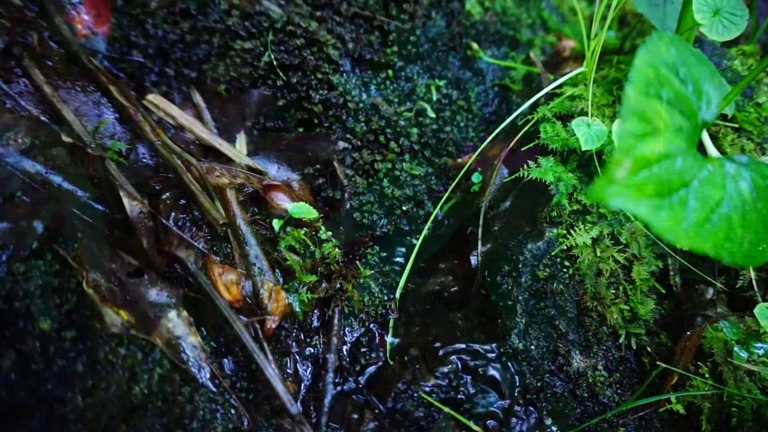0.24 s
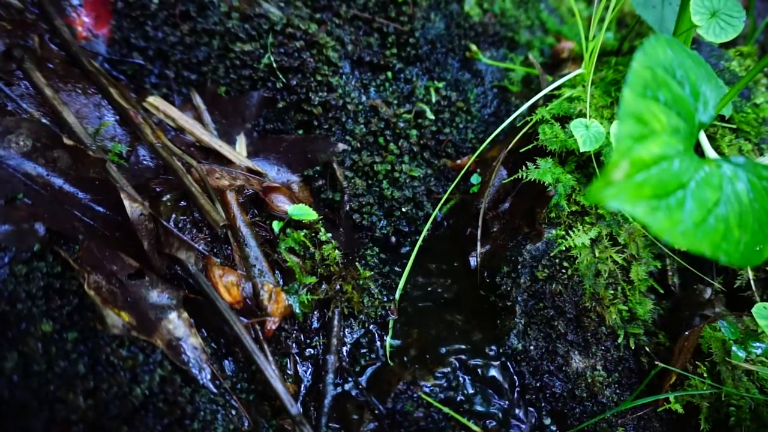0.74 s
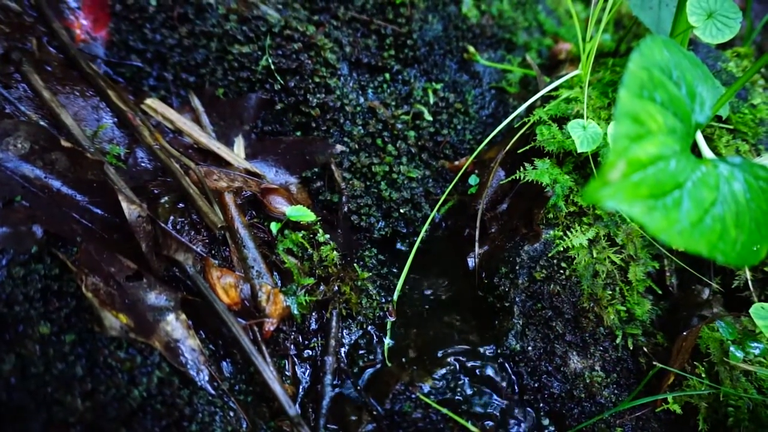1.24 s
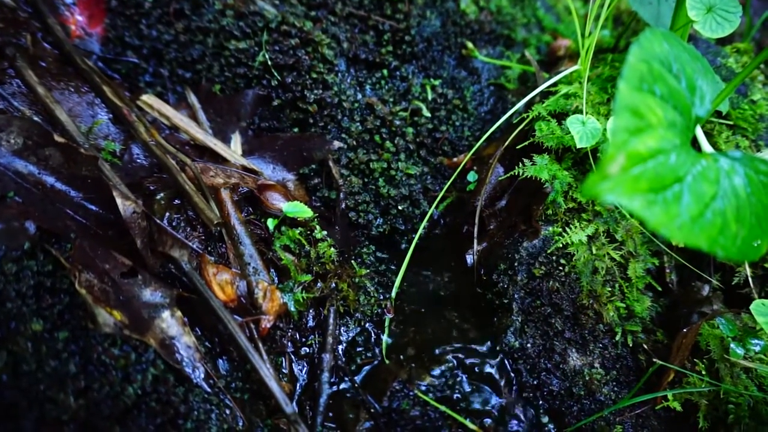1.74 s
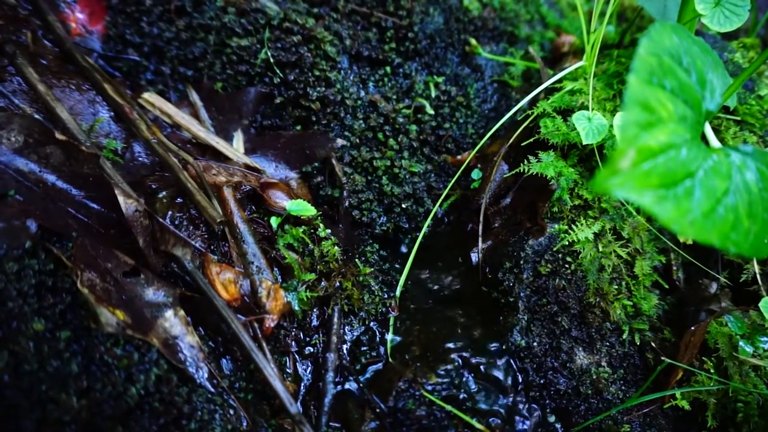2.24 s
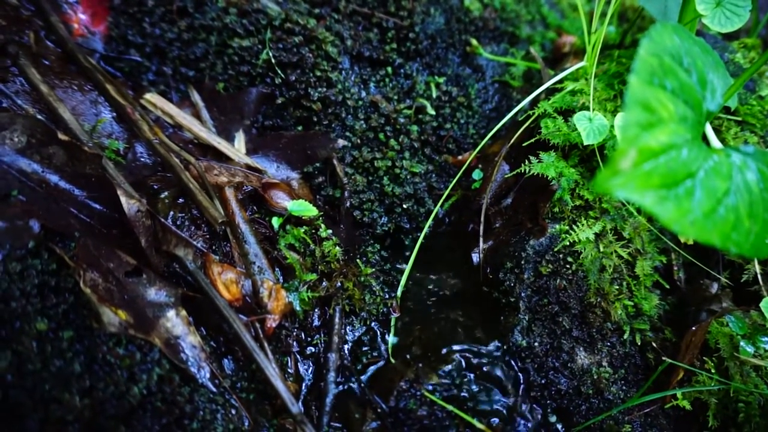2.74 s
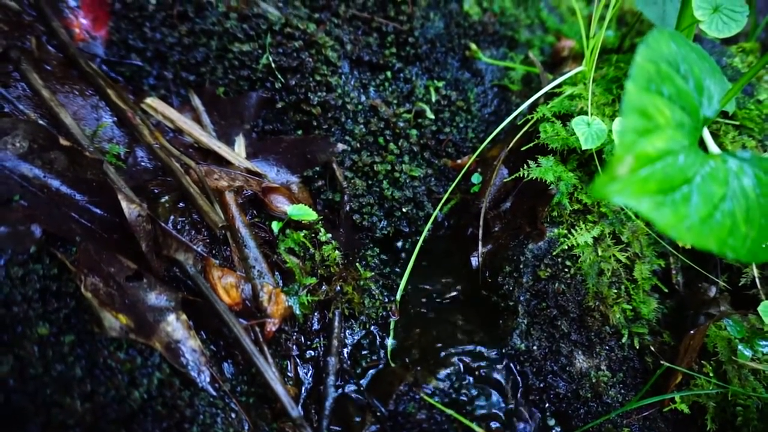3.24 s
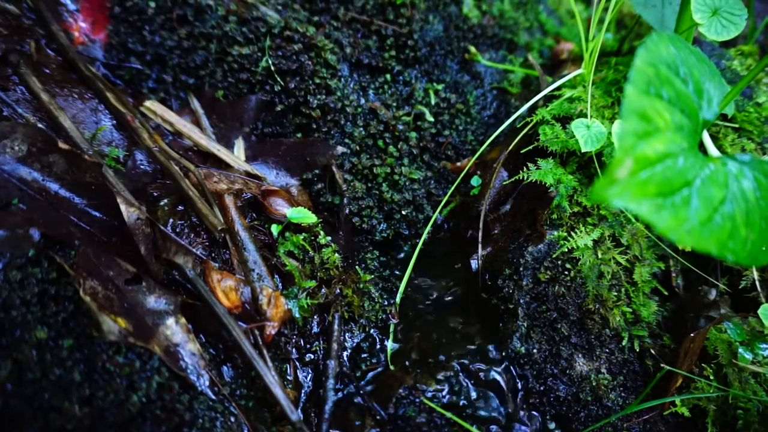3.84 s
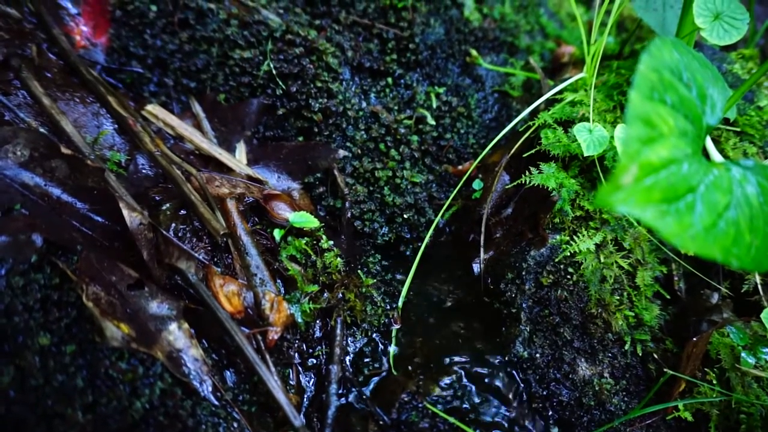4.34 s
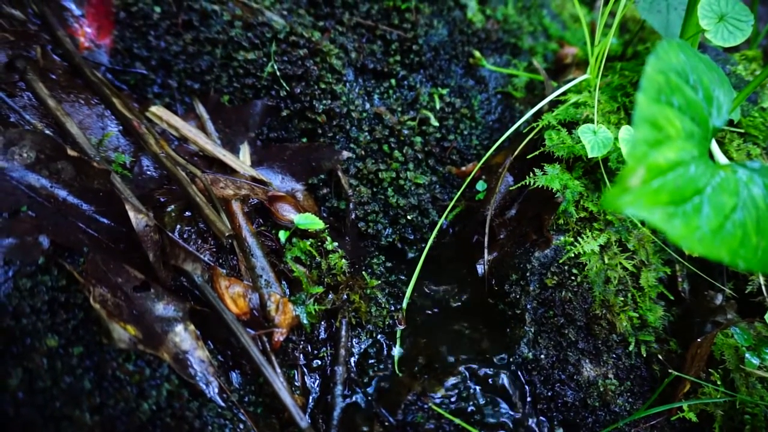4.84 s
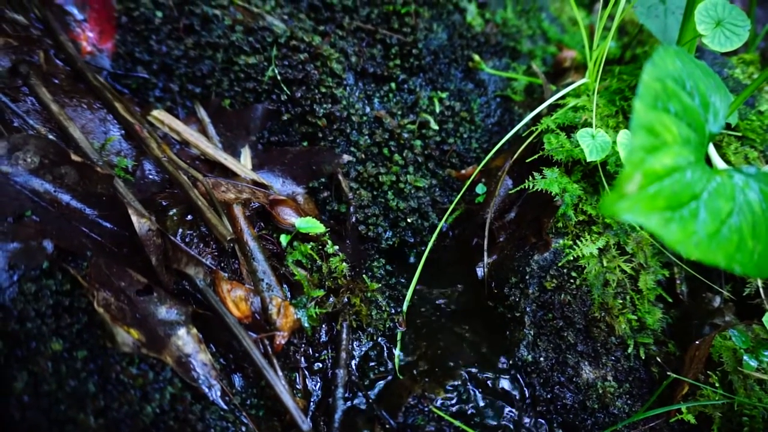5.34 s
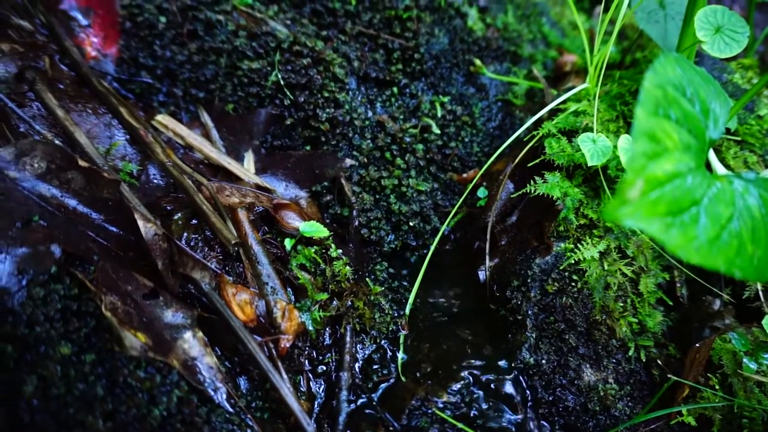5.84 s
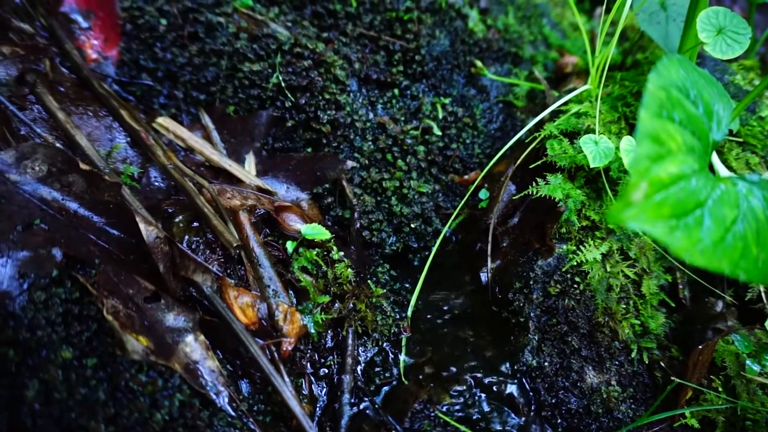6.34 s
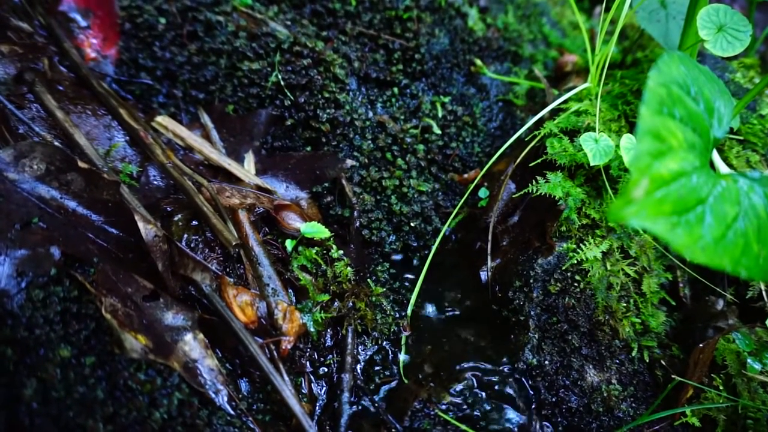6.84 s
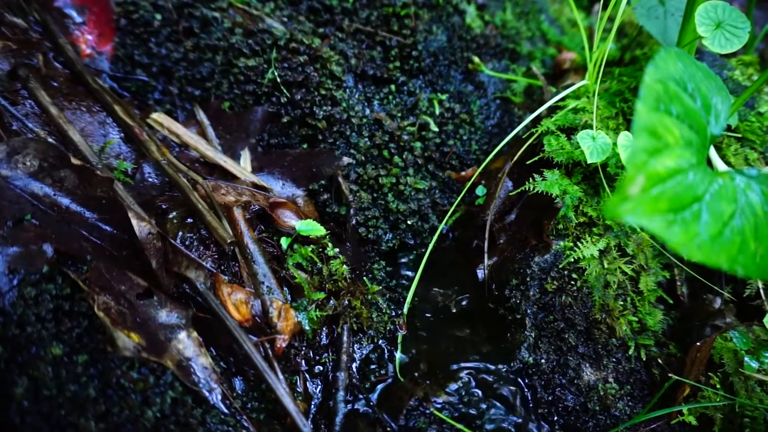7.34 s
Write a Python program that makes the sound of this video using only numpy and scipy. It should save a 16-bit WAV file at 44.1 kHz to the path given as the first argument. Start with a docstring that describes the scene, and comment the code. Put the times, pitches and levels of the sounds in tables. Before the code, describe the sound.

Steady close-up spring water in a small rock hollow. Drops slap the pool at random, each a very short, hollow mid-pitched plop with a tiny splash; clear bubbles blip upward and fainter low gurgles swell between them. Crisp high clicks of bursting films sparkle around. A soft babble and thin wash fill the gaps. Nearly dry, little bass, wide stereo with brighter plips toward the left.

```python
"""A small spring trickles over mossy rock into a shallow pool, close by and mostly a little to the left.
Drops slap the surface as paired short swings; bubbles are decaying sines that rise in pitch;
larger pockets are swelling upward sweeps; bursting films and spray are pings with a noise splat.
Beneath lie babble (many weak bubbles in the rock hollow), fizz (tiny rings) and a wash of filtered noise."""
import sys
import numpy as np
from scipy import signal
from scipy.fft import rfft, irfft, next_fast_len
from scipy.io import wavfile

SR = 44100
rng = np.random.default_rng(int(sys.argv[2]) if len(sys.argv) > 2 else 0)


def digitize_waveform(pressure):
    """Quantize a signal to 16-bit integers and store it at the path in sys.argv[1].

    Rows of a 2-D input are taken as channels; values are limited to [-1, 1].
    """
    field = np.atleast_2d(pressure).T
    bounded = np.clip(field, -1, 1)
    quanta = np.round(bounded * 32767).astype(np.int16)
    wavfile.write(sys.argv[1], SR, quanta)


N = 334719

# clear bubbles: t/s, peak level before BUBBLE_GAIN_DB/dB, start pitch f/Hz, decay time/ms
BUBBLES = [(0.0845, -31.5, 1305, 3.9), (0.5029, -21, 1780, 1.4), (0.597, -23.5, 1310, 3.3),
           (0.6491, -22.5, 1180, 9.6), (0.6622, -16.5, 1490, 0.61), (0.7188, -24, 1680, 1.3),
           (0.946, -20.5, 1180, 3.1), (0.954, -12.5, 1020, 3.5), (0.9579, -14, 1170, 1.9),
           (1.0507, -14.5, 822, 4.3), (1.2348, -23.5, 1390.0, 1.1), (1.2548, -28, 646, 2.9),
           (1.774, -30.5, 1310, 4.3), (1.794, -23.5, 1675, 3.4), (1.697, -30.5, 1290, 3),
           (2.732, -21, 1396, 1.8), (3.1717, -17, 1360, 2), (3.269, -10, 1470, 0.95),
           (3.192, -31, 930, 5.2), (3.4885, -32, 1500, 2.7), (3.5204, -25, 714, 2.5),
           (3.554, -30, 1330, 4.2), (3.6244, -27.5, 740, 1.6), (4.3294, -24.5, 1110.0, 1.8),
           (4.4326, -29.5, 1280, 6.3), (4.492, -31, 1284, 9.6), (4.5409, -22.5, 1680, 0.7),
           (4.5762, -23.5, 1260, 3.7), (4.728, -29.5, 818, 6), (4.9783, -22, 1214, 2.5),
           (5.183, -34.5, 580, 3), (5.324, -24.5, 1220, 4.2), (5.3405, -16.5, 1530, 1.8),
           (5.3834, -23, 1320, 3.8), (5.665, -22.5, 1540, 1.2), (5.801, -23, 907, 4.1),
           (5.8604, -19.5, 1240, 2.3), (5.902, -23.5, 1170, 1.2), (5.9704, -24, 1800, 2.5),
           (6.604, -30, 1775, 3), (6.008, -33, 600, 2.5), (6.2184, -28.5, 1243, 3.7),
           (6.7421, -25, 1404, 4.5), (6.9246, -19, 1420, 1.4), (7.2495, -26.5, 1066, 3),
           (7.266, -21.5, 1355, 2), (7.56, -22.5, 1600, 1.2)]
# air pockets that swell and surface: t/s, start pitch f/Hz, peak level/dB, length/ms
GULPS = [(0.046, 400, -39.5, 22), (0.193, 367, -42.5, 38), (0.275, 358, -39, 53), (0.474, 394, -34, 14.5),
         (0.682, 368, -46, 49), (0.832, 251, -47, 54), (0.959, 1560, -28, 8.5), (1.047, 482, -33, 43),
         (1.054, 848, -21, 18.2), (1.321, 427.5, -43, 44), (1.568, 284, -42, 21), (1.677, 360, -46, 40),
         (1.766, 320, -41.5, 37), (1.961, 376, -37.5, 40), (2.339, 327, -43.5, 32),
         (2.443, 335, -38.5, 28.5), (2.735, 410, -40, 27), (2.925, 454, -43, 30), (3.148, 368, -32, 27.5),
         (3.232, 304, -39.5, 31), (3.355, 389, -38.5, 24), (3.423, 372, -39, 41), (3.803, 370, -45, 24),
         (4.172, 754, -28.5, 16), (4.448, 810, -27, 21), (4.584, 403, -45, 64), (5.218, 347, -34, 39),
         (5.423, 460, -52, 36), (5.476, 457, -44, 29), (5.623, 423, -32.5, 33), (5.692, 460, -33.5, 29),
         (5.796, 733, -31.5, 45), (6.111, 365, -36, 25), (6.212, 397, -41, 32), (6.326, 396, -39, 33),
         (6.518, 408, -31.5, 27), (6.738, 600, -30, 23), (6.839, 456, -34.5, 16), (6.938, 460, -28, 17.6),
         (7.052, 477, -37, 9.8), (7.265, 451, -32, 28.4)]
# drops that slap the pool without a clear ring: t/s, peak level/dB, centre f/Hz
DROPS = [(0.053, -26, 1300), (.171, -30.5, 1100), (.379, -20, 1080), (0.427, -26.5, 830),
         (0.795, -34, 1250), (1.1995, -24, 1530), (1.219, -32, 1380), (1.48, -28, 1340),
         (1.546, -29.5, 860), (1.589, -27, 1160), (1.683, -23.5, 880), (1.745, -27.5, 770),
         (1.881, -30, 607), (1.928, -31.5, 1290), (1.953, -26, 1300), (2.0195, -27, 1140),
         (2.151, -34, 1310), (2.32, -32.5, 1400), (2.495, -30.5, 1040), (2.542, -28.5, 1280),
         (2.589, -27.5, 1440), (2.645, -33.5, 1050), (2.671, -27.5, 900), (2.984, -27.5, 1130),
         (3.1125, -19.5, 1220), (3.376, -25.5, 1260), (3.4706, -22, 890), (3.535, -27, 1080),
         (3.593, -25.5, 1220), (3.82, -29.5, 1175), (3.883, -24, 1210), (3.922, -31, 1040),
         (4.004, -25.5, 1100), (4.053, -27, 1020), (4.133, -30, 1100), (4.1708, -26.5, 1010),
         (4.527, -30, 1710), (4.627, -30, 1140), (4.715, -30.5, 860), (4.751, -23.5, 1060),
         (5.062, -30.5, 1220), (5.417, -30.5, 1440), (5.545, -29, 1420), (5.6094, -21, 1280),
         (5.716, -31, 1360), (5.878, -24.5, 2000), (5.991, -25, 1910), (6.048, -28, 1270),
         (6.1198, -20, 1610), (6.301, -30, 1210), (6.396, -24.5, 1050), (6.436, -32.5, 1550),
         (6.5273, -21, 1040), (6.5361, -22.5, 1290), (6.643, -27, 890), (7.011, -22.5, 1710),
         (7.071, -27.5, 1440), (7.1407, -25.5, 1090), (7.176, -30, 1450), (7.283, -33, 920),
         (7.4376, -18.5, 1550), (7.474, -25, 1500), (7.509, -28.5, 1130), (7.551, -24, 1400)]
# sharpest spray ticks: t/s, level before TICK_GAIN_DB/dB, centre f/Hz
TICKS = [(0.129, -23, 9940), (0.3417, -29.5, 4080), (0.6994, -25, 6230), (.724, -25, 7750),
         (1.306, -23, 13000), (1.3324, -28, 5960), (1.459, -27, 14900), (1.757, -24.5, 14600),
         (1.951, -27, 3160), (2.436, -25.5, 12200), (2.6268, -25, 11800), (2.9147, -24.5, 10400),
         (2.998, -26, 11900), (3.13, -25, 3270), (3.139, -29, 11700), (3.174, -20.5, 11700),
         (3.701, -19, 4880), (3.7615, -25, 13600), (3.9572, -28, 14500), (4.6552, -25.5, 12900),
         (5.0775, -23.5, 3430), (5.1176, -23, 11940), (5.379, -28, 12500), (5.769, -27, 7300),
         (6.0205, -27, 8840), (6.1432, -28, 11100), (6.2983, -29, 10400), (6.3664, -27.5, 5970),
         (6.452, -29, 14100), (6.63, -27, 13200), (6.877, -27.5, 13150), (7.1616, -26.5, 9600),
         (7.2623, -33, 14300), (7.4, -25, 8660), (7.576, -23, 7750)]
# resonances of the rock hollow: f/Hz, decay time/ms, relative level/dB
HOLLOW_MODES = [(480, 2.2, -8), (890, 2.4, -2), (1260, 2.4, 0), (1720, 2.0, -4), (2400, 1.2, -16)]
# where the pool lies: f/Hz, left minus right/dB
POOL_PAN = [(350, -9.5), (700, 2), (1300, 5), (2200, 14)]
# colour of the babble leaving the hollow: f/Hz, gain/dB
BABBLE_COLOUR = [(150, -3), (330, 11), (520, 11.5), (740, 1.5), (930, 13), (1100, -3.5), (1280, 14),
                 (1720, 10.5), (3200, 19)]
# spectrum of the running water's murmur: f/Hz, relative density/(dB per Hz)
MURMUR_SPECTRUM = [(25, -28), (84, -20.5), (200, -14.5), (450, -5), (1500, -3), (5000, -16)]

BUBBLE_GAIN_DB, TICK_GAIN_DB = 3.0, -5.5
# pitch rise, in start pitches per s, at a table level of RISE_FROM_DB; each RISE_DOUBLING_DB more doubles it
RISE_PER_S, RISE_FROM_DB, RISE_DOUBLING_DB = 11, -18, 3
KNOCK_DB = -15
HOLLOW_SPREAD = 0.047  # standard deviation of the resonances' shift from spot to spot, as a share
DROP_DECAY_MS, DROP_KNOCK_DB, DROP_RISE_PER_S = 1, -6, 60
CRATER_LAG_MS, CRATER_DB = 2.547, -4.5  # closing swing after the slap; lag is scaled at random
# faint gulp with each drop: level re drop peak; start pitch and length before random scaling
WAKE_DB, WAKE_HZ, WAKE_MS = -19, 400, 34
OCTAVE_SWEEP_MS, SWEEP_BEND = 15.47, 1.693  # a gulp this long climbs one octave, ever faster
GULP_SKEW = 0.73  # under 1: swells quickly, fades slowly
# splash: level re table level, capped at the limit; pitch before random scaling
SPLASH_DB, SPLASH_LIMIT_DB, SPLASH_HZ = -23, -12, 2980
TOP_HZ = 16000


def pool():
    """Plips, slaps and gulps where the trickle lands; bubbles nearer the surface are louder and rise faster."""
    out = np.zeros((2, N))
    for s, db, hz, decay_ms in BUBBLES:
        rise_per_s = RISE_PER_S * 2 ** ((db - RISE_FROM_DB) / RISE_DOUBLING_DB)
        add(out, s, undb(db + BUBBLE_GAIN_DB) * bubble(hz, decay_ms, rise_per_s))
    for s, db, hz in DROPS:
        add(out, s, undb(db) * drop(hz))
        pitch_scale, length_scale = 2 ** rng.uniform(-0.478, 0.42, size=2)
        wake = gulp(WAKE_HZ * pitch_scale, WAKE_MS * length_scale)
        add(out, s, undb(db + WAKE_DB) * wake)
    for s, hz, db, length_ms in GULPS:
        add(out, s, undb(db) * gulp(hz, length_ms))
    return out


def bubble(hz, decay_ms, rise_per_s, knock_db=KNOCK_DB, onset_cycles=0.9):
    """Air pinches off with a knock that rings the hollow, then rings down, sharpening as it nears the surface."""
    ms = np.arange(int((6 * decay_ms + 6) * SR / 1000)) * 1000 / SR
    t = np.arange(len(ms)) / SR
    onset = 1 - np.exp(-(t * hz / onset_cycles) ** 2)
    swing = np.exp(-ms / decay_ms) * onset
    tone = swing / swing.max() * np.sin(2 * np.pi * hz * (t + rise_per_s * t ** 2 / 2))
    # each spot meets the resonances in its own way
    spot = rng.standard_normal((len(HOLLOW_MODES), 2))
    knock = np.zeros(len(ms))
    for (mode_hz, ring_ms, db), (weight, shift) in zip(HOLLOW_MODES, spot):
        # resonances within half an octave merge with the bubble
        apart = min(abs(np.log2(mode_hz / hz)) * 2, 1)
        ring = np.sin(2 * np.pi * mode_hz * (1 + HOLLOW_SPREAD * shift) * t)
        knock += undb(db) * weight * apart * np.exp(-ms / ring_ms) * ring
    return (tone + undb(knock_db) * knock * onset) * pan(curve(hz, POOL_PAN))


def drop(hz):
    """A slap, then its crater closes: two short swings that knock the hollow, mono peak 1."""
    closing_hz = hz * 2 ** rng.uniform(-0.74, 0)
    slap = bubble(hz, DROP_DECAY_MS, DROP_RISE_PER_S, DROP_KNOCK_DB)
    closing = bubble(closing_hz, DROP_DECAY_MS, DROP_RISE_PER_S, DROP_KNOCK_DB)
    lag = int(CRATER_LAG_MS * rng.uniform(0.52, 1.99) * SR / 1000)
    sound = np.pad(slap, ((0, 0), (0, lag)))
    sound = sound + undb(CRATER_DB) * np.pad(closing, ((0, 0), (lag, 0)))
    return sound / np.abs(sound.mean(axis=0)).max()


def gulp(hz, length_ms):
    """A large pocket swells and sweeps upward until it opens; a longer one sweeps further."""
    u = np.linspace(0, 1, int(length_ms * SR / 1000))
    pitch_hz = hz * (1 + length_ms / OCTAVE_SWEEP_MS) ** (u ** SWEEP_BEND)
    swell = np.sin(np.pi * u ** GULP_SKEW)
    sweep = np.sin(2 * np.pi * np.cumsum(pitch_hz) / SR)
    return swell * sweep * pan(curve(pitch_hz.mean(), POOL_PAN))


def splashes(left_db=4):
    """Each clear bubble or drop breaks the surface with a small splash."""
    out = np.zeros((2, N))
    for s, db, *_ in BUBBLES + DROPS:
        hz = SPLASH_HZ * 2 ** rng.uniform(-0.84, 1)
        splash = tick(hz, left_db, cycles=1.0)
        add(out, s, undb(min(db, SPLASH_LIMIT_DB) + SPLASH_DB) * splash)
    return out


def spray(rate_per_s=45, top_db=-32, range_db=21, low_hz=4500, high_hz=16000, left_db=4, spread_db=3):
    """Sharp ticks of bursting films around the pool, and a scattered crackle of droplets on stone."""
    out = np.zeros((2, N))
    for s, db, hz in TICKS:
        pan_db = left_db + spread_db * rng.standard_normal()
        add(out, s, undb(db + TICK_GAIN_DB) * tick(hz, pan_db))
    for s, size, strength, place in chances(rate_per_s, count=3):
        hz = low_hz + (high_hz - low_hz) * size
        pan_db = left_db + 2 * spread_db * (2 * place - 1)
        crackle = tick(hz, pan_db, cycles=3, splat_db=-11)
        add(out, s, undb(top_db - range_db * np.sqrt(strength)) * crackle)
    return out


def tick(hz, pan_db, cycles=5, splat_ms=.6, splat_db=-9, scatter_ms=2.5, scatter_db=-24, attack_ms=.45):
    """A burst film's tiny cavity pings; stone and leaves scatter the splat differently to each side."""
    ms = np.arange(SR // 70) * 1000 / SR
    turns = hz * np.arange(len(ms)) / SR
    ping = np.exp(-turns / cycles) * np.sin(2 * np.pi * (turns + .4 * rng.random((2, 1))))
    splat = undb(splat_db) * np.exp(-ms / splat_ms) + undb(scatter_db) * np.exp(-ms / scatter_ms)
    # splat is brightest around the cavity's pitch
    b, a = signal.iirpeak(min(hz, .4 * SR), 2.2, fs=SR)
    noise = signal.lfilter(b, a, rng.standard_normal((2, len(ms))))
    sound = (ping + 2 * splat * noise) * (1 - np.exp(-(ms / attack_ms) ** 2))
    # mono rms 1 over the first 1.5 ms, before panning
    rms = np.sqrt(np.mean(sound.mean(axis=0)[ms < 1.5] ** 2))
    return sound / rms * pan(pan_db)


def babble(rate_per_s=85, top_db=-41, range_db=15, low_hz=520, high_hz=2600, cycles=3.2):
    """Many weak bubbles merge into a soft babble in the hollow; small ones die sooner."""
    out = np.zeros((2, N))
    for s, size, strength, damping, rise in chances(rate_per_s, count=4):
        hz = low_hz * (high_hz / low_hz) ** size
        decay_ms = 1000 * cycles / hz * 2 ** (2 * damping - 1)
        plip = bubble(hz, decay_ms, 60 * rise, knock_db=0)
        add(out, s, undb(top_db - range_db * np.sqrt(strength)) * plip)
    return colour(out, BABBLE_COLOUR)


def fizz(rate_per_s=300, top_db=-37, range_db=18, low_hz=2300, high_hz=15000, cycles=9):
    """Countless pinhead bubbles in the foam each swell and ring for a few cycles."""
    out = np.zeros((2, N))
    for s, size, strength, place, lag in chances(rate_per_s, count=4):
        hz = low_hz * (high_hz / low_hz) ** size
        age = np.arange(int(6 * cycles * SR / hz)) * hz / SR / cycles  # in decay times
        swing = np.exp(-age) * (1 - np.exp(-(2 * age) ** 2))
        # higher pitch: the paths to the two sides can differ more in phase
        turns = age * cycles + np.array([[0], [size * (2 * lag - 1)]])
        ring = swing * np.sin(2 * np.pi * turns) * pan(10 * place - 1)
        add(out, s, undb(top_db - range_db * np.sqrt(strength)) * ring)
    return out


def wash(murmur_db=-53.0, hiss_db=-56.0):
    """The water film runs on: a nearly central murmur and a wide, flat hiss, both filtered noise."""
    mid, side = rng.standard_normal((2, N))
    murmur = colour(mid + .5 * side * np.array([[1], [-1]]), MURMUR_SPECTRUM)
    hiss = highpass(rng.standard_normal((2, N)), hz=1940, order=2)
    return level(murmur, murmur_db) + level(hiss, hiss_db) * pan(1)


def surroundings(x, wet_db, decay_ms):
    """Short diffuse return from the rock and undergrowth: convolution with decaying noise."""
    ms = np.arange(SR // 6) * 1000 / SR
    echo = rng.standard_normal((2, len(ms))) * np.exp(-ms / decay_ms) * (1 - np.exp(-ms / 2))
    echo /= np.sqrt(np.sum(echo ** 2, axis=1, keepdims=True))
    return x + undb(wet_db) * signal.fftconvolve(x, echo, axes=1)[:, :N]


def highpass(x, hz, order):
    """Butterworth high-pass: small sources radiate little bass."""
    return signal.sosfilt(signal.butter(order, hz, "high", fs=SR, output="sos"), x)


def colour(x, points):
    """Causal filter with the given (f/Hz, gain/dB) response, built from its cepstrum."""
    size = next_fast_len(N + SR // 10, True) // 2 * 2
    bins_hz = np.arange(size // 2 + 1) * SR / size
    cepstrum = irfft(np.log(undb(curve(bins_hz, points))))
    # fold to minimum phase
    cepstrum[1:size // 2] *= 2
    cepstrum[size // 2 + 1:] = 0
    return irfft(rfft(x, size) * np.exp(rfft(cepstrum)))[..., :N]


def curve(hz, points):
    """Read (f/Hz, value) points on a log-frequency axis."""
    f, value = np.transpose(points)
    return np.interp(np.log(hz + 1), np.log(f), value)


def chances(rate_per_s, count):
    """Random moments at a mean rate, each with count uniform values."""
    local_rng = np.random.default_rng(rng.integers(2 ** 31))
    rows = local_rng.random((int(rate_per_s * N / SR), count + 1))
    rows[:, 0] *= N / SR
    return rows


def undb(db):
    """Decibels to gain."""
    return 10 ** (np.asarray(db) / 20)


def level(x, db):
    """Scale to an rms level."""
    return x * undb(db) / np.sqrt(np.mean(x ** 2))


def pan(db):
    """Left and right gains, mean 1, for a left-minus-right difference in dB."""
    gains = undb(np.array([[db], [-db]]) / 2)
    return gains / gains.mean()


def add(out, s, sound):
    """Mix a short sound in at time s."""
    i = int(np.clip(s * SR, 0, N - 1))
    out[:, i:i + sound.shape[-1]] += sound[..., :N - i]


def scene():
    """Pool, babble, spray, splashes and fizz among the rocks, over the wash."""
    water = highpass(pool() + babble(), hz=297, order=3)
    water = surroundings(water, wet_db=-8.0, decay_ms=4.4)
    droplets = highpass(spray() + splashes() + fizz(), hz=1400, order=2)
    droplets = surroundings(droplets, wet_db=-15, decay_ms=7)
    return water + droplets + wash()


def record(dry):
    """Steep elliptic low-pass: nothing sounds above about 16 kHz."""
    return signal.sosfilt(signal.ellip(10, .2, 70, TOP_HZ, fs=SR, output="sos"), dry)


dry = scene()
out = record(dry)
digitize_waveform(out)
```